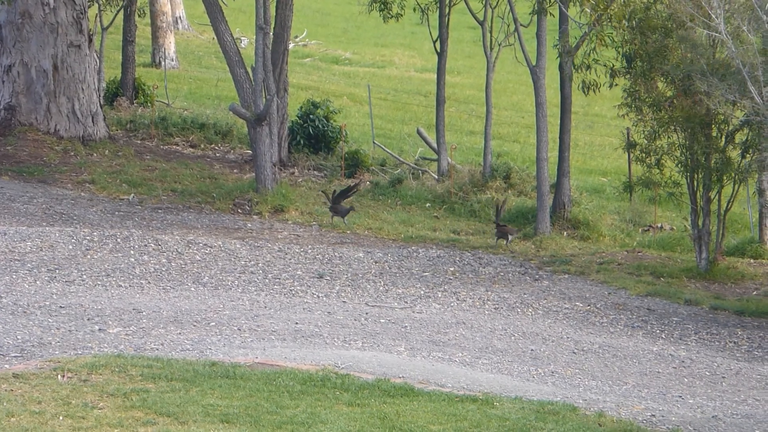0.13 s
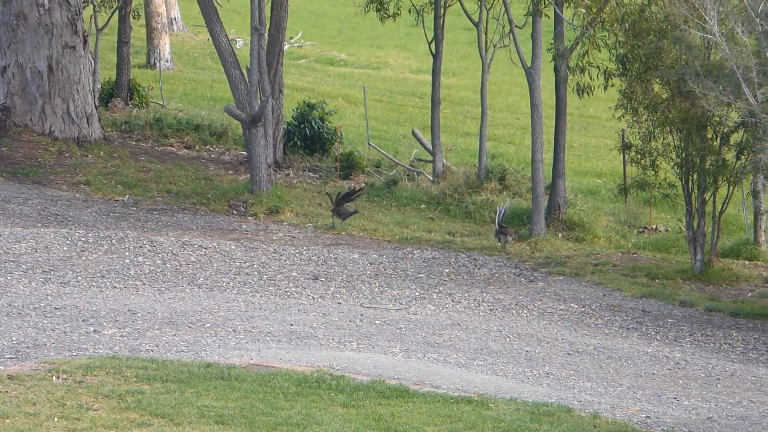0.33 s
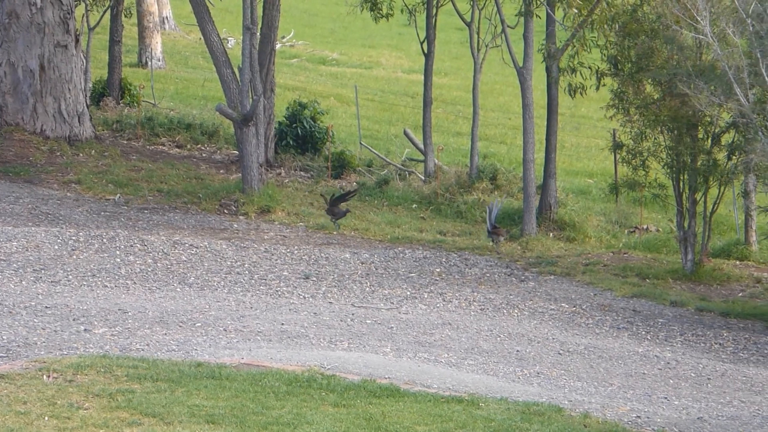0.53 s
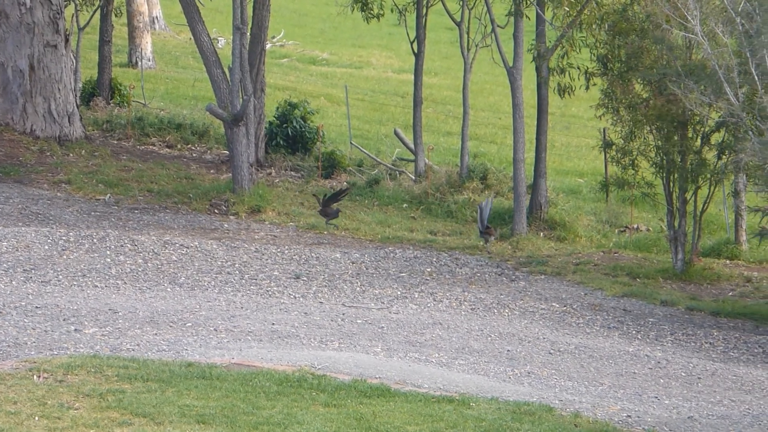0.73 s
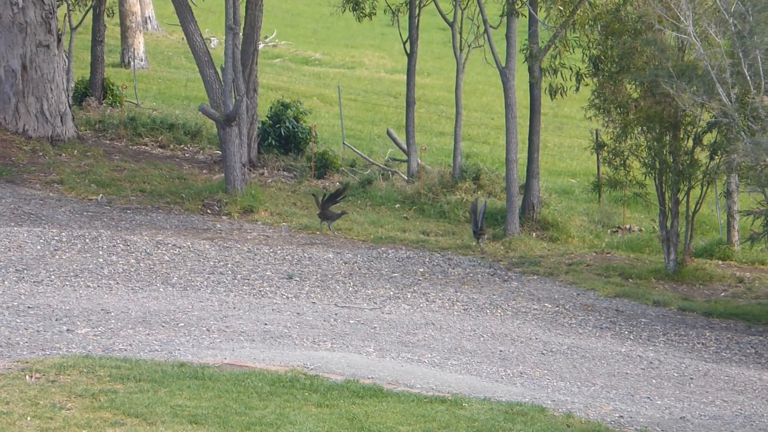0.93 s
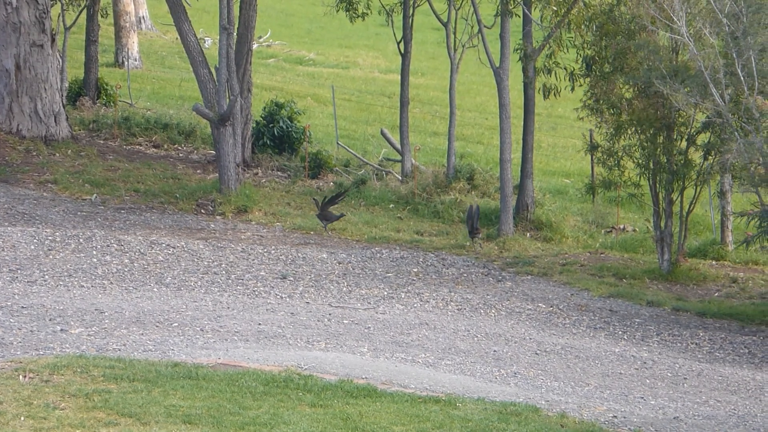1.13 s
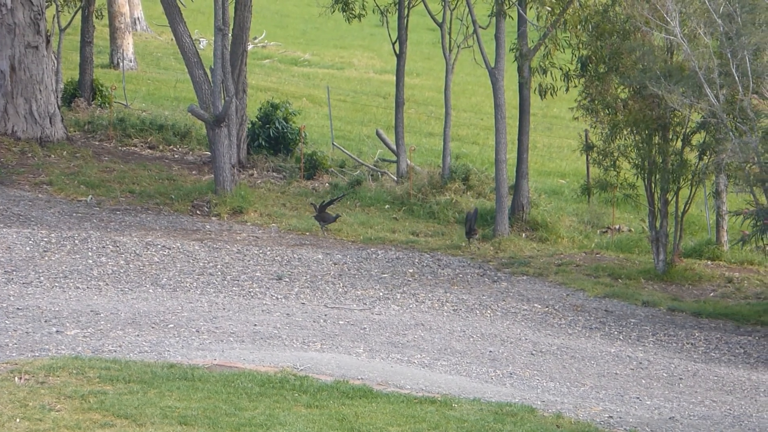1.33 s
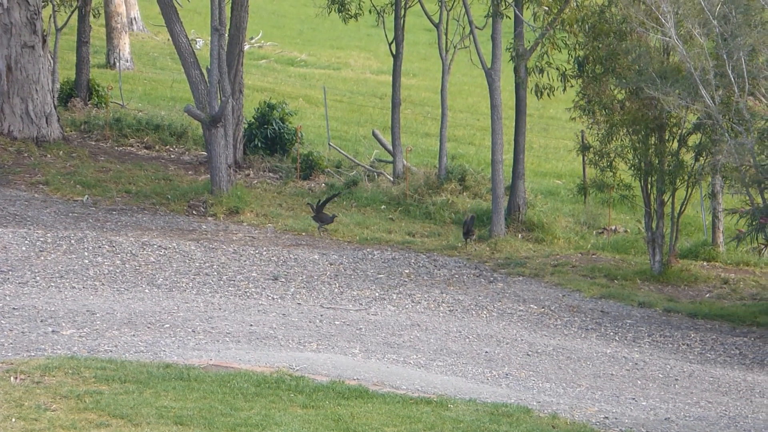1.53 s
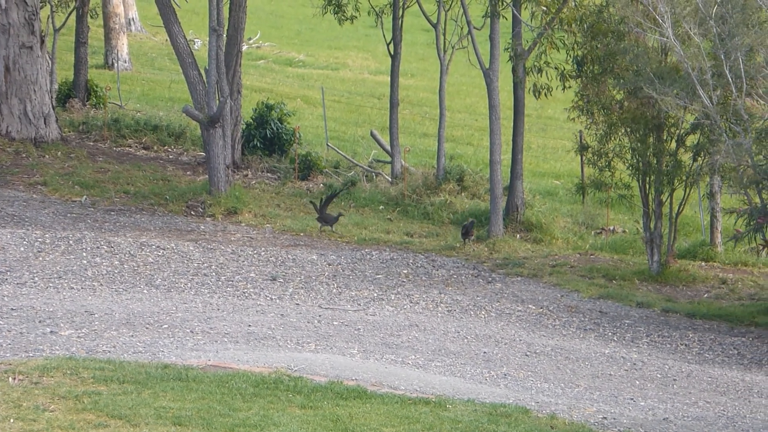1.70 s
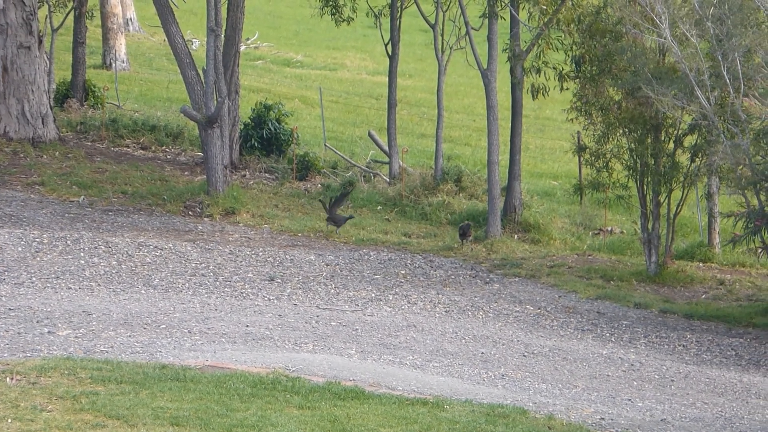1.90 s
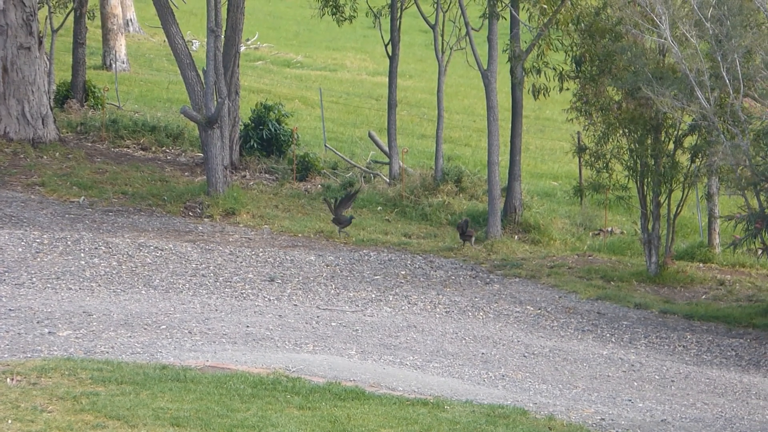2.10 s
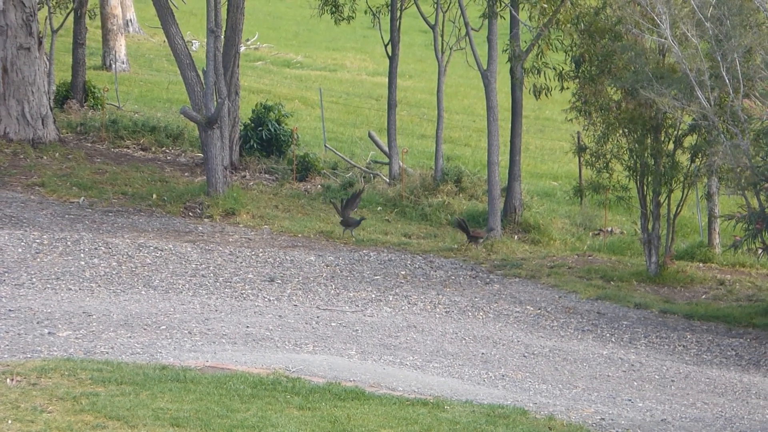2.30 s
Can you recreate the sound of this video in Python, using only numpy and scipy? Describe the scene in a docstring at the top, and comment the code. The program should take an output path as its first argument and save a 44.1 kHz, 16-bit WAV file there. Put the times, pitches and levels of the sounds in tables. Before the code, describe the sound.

A bird some way off whistles three quick calls, each a soft slur flicking into a sharp rising chirp, echoing among trees; then only low steady outdoor noise until a faint fourth call begins at the end.

```python
"""A bird some way off among trees gives three whistled calls and begins a fourth: a soft slur, then a sharp upward sweep.
Each note is a gliding near-pure tone with a fast warble in pitch and loudness, a weak octave and a trace of rasp.
Trunks, foliage and far trees scatter it into a dying tail of random echoes.
Behind it lie steady shaped noise, a low wavering hum with one soft thud, and a faint high hiss."""
import sys
import numpy as np
from scipy import signal
from scipy.fft import rfft, irfft
from scipy.io import wavfile
from scipy.ndimage import uniform_filter1d, map_coordinates

SR = 44100
rng = np.random.default_rng(int(sys.argv[2]) if len(sys.argv) > 2 else 0)


def store_wav(level_fs):
    """Save 16-bit WAV to argv[1]."""
    pcm = np.round(np.clip(np.atleast_2d(level_fs), -1, 1) * 32767)
    wavfile.write(sys.argv[1], SR, pcm.T.astype(np.int16))


N = 103635


def undb(db):
    """Decibels to amplitude gain."""
    return 10 ** (np.asarray(db) / 20)


def unit(x):
    """Scale to rms 1."""
    return x / np.sqrt(np.mean(x ** 2))


def walk(rate_hz):
    """Smooth random curve of rms 1: random steps at rate_hz, averaged twice over one step."""
    step = int(SR / rate_hz)
    steps = np.repeat(rng.standard_normal(N // step + 1), step)
    smooth = uniform_filter1d(uniform_filter1d(steps, step), step)
    return unit(smooth[:N])


def bin_gains(points):
    """Gain of each FFT bin from (hz, db) points, interpolated over log frequency."""
    hz, db = np.array(points, float).T
    bin_hz = np.arange(N // 2 + 1) * SR / N
    return undb(np.interp(np.log(bin_hz + 1), np.log(hz), db))


def shaped_noise(gain):
    """White noise filtered by a gain per FFT bin."""
    return irfft(rfft(rng.standard_normal(N)) * gain, N)


def overtone_gain(pitch_hz):
    """Octave gain: the throat damps the octave above a knee, down to a weak floor."""
    low_db, floor_db, knee_hz = -21, -42, 3200
    return undb(low_db) / np.sqrt(1 + (2 * pitch_hz / knee_hz) ** 20) + undb(floor_db)


def note(t, curve, warble):
    """Gliding whistle whose warble deepens with loudness; a pitch lead makes a sweep climb in steps."""
    # hiss that goes with the tone: hz, level_db (per Hz, relative)
    rasp_band = [(3000, -21), (6000, -7), (8000, -8), (11000, -3.5), (13000, -34)]
    rasp_db, fade_s = -45, 0.0021
    jitter = 0.0026  # rms fraction of pitch
    softening = .45  # dB of warble depth lost per dB below the loudest point

    time_s, pitch_hz, level_db = np.array(curve, float).T
    rate_hz, crest_s, swing_hz, dip_db, lead_rad = warble
    loudness_db = np.interp(t, time_s, level_db)
    depth = undb(softening * (loudness_db - level_db.max()))
    beat = 2 * np.pi * rate_hz * (t - crest_s)

    swing = depth * swing_hz * np.cos(beat + lead_rad)
    pitch = (np.interp(t, time_s, pitch_hz) + swing) * (1 + jitter * walk(600))
    phase = 2 * np.pi * np.cumsum(pitch) / SR
    tone = np.sin(phase) + overtone_gain(pitch) * np.sin(2 * phase)
    rasp = undb(rasp_db) * unit(shaped_noise(bin_gains(rasp_band)))

    fade_in = np.clip((t - time_s[0]) / fade_s + 1, 0, 1)
    fade_out = np.clip((time_s[-1] - t) / fade_s + 1, 0, 1)
    trough = ((1 - np.cos(beat)) / 2) ** 2
    level = undb(loudness_db - dip_db * np.sqrt(depth) * trough)
    return (np.sqrt(2) * tone + rasp) * fade_in * fade_out * level


def scatter(x, t60_s, level_db, likeness):
    """Sparse random echoes from the trees, dying exponentially, partly shared by the two ears."""
    first_echo_s, echoes_per_s = .009, 4000
    t = np.arange(N) / SR
    hits = rng.random((3, N)) < echoes_per_s / SR
    echoes = rng.standard_normal((3, N)) * hits
    echoes = echoes * (t > first_echo_s) * np.exp(-np.log(1000) * t / t60_s)
    echoes = echoes / np.sqrt(np.sum(echoes ** 2, axis=1, keepdims=True) + 1e-18)
    share = np.clip(likeness, 0, 1)
    response = np.sqrt(share) * echoes[0] + np.sqrt(1 - share) * echoes[1:]
    return undb(level_db) * signal.fftconvolve(x[None], response, axes=1)[:, :N]


def bird(t):
    """Notes slightly left by level and arrival time, plus echoes from trunks, foliage and far trees."""
    # note curves: time_s, pitch_hz, level_db
    slur_1 = [(0.087, 2096, -45), (0.109, 2200, -32), (0.136, 2300, -24.5), (0.164, 2317, -20),
              (.18, 2097, -21), (0.199, 1557, -30.5), (0.217, 1234, -36.5), (0.238, 1284, -40)]
    sweep_1 = [(0.235, 1350, -33), (.252, 1856, -32.5), (.263, 2184, -19.5), (0.275, 2530, -16),
               (.289, 3002, -12), (0.3, 3445, -16.5), (.313, 3830, -24.5), (.326, 4140, -33)]
    slur_2 = [(.505, 1705, -49), (0.512, 1562, -39), (0.527, 1404, -46.5), (0.532, 1177, -34.5),
              (0.546, 1085, -46), (.565, 796, -54.5), (0.582, 777, -43)]
    sweep_2 = [(.58, 797, -52.5), (.593, 1460, -45.5), (.604, 2174, -29.5), (0.616, 2663, -18),
               (.629, 3070, -17), (.641, 3720, -26), (0.652, 4160, -38), (0.663, 4330, -41)]
    slur_3 = [(0.806, 1650, -53), (.82, 1493, -55), (.845, 1159, -51), (0.871, 839, -51.5), (.89, 733, -53)]
    sweep_3 = [(0.941, 878, -48), (.96, 1281, -41), (.976, 1571, -28), (.987, 1890, -33),
               (0.996, 2225, -21), (1.003, 2653, -13.5), (1.014, 3270, -26.5), (1.022, 3810, -39),
               (1.03, 3900, -36.5)]
    slur_4 = [(2.275, 2080, -58), (2.295, 2074, -41), (2.319, 2090, -44), (2.336, 2280, -36),
              (2.352, 2500, -31.5)]
    # warble per note at its loudest: rate_hz, crest_s, pitch_swing_hz, dip_db,
    # lead_rad (pitch ahead of loudness)
    warbles = [(75, .1372, 210, 12, 0), (78.5, .2756, 150, 9, .7), (60, .533, 30, 5, .7),
               (83, .6176, 150, 9, .8), (60, .82, 30, 5, .7), (97, 1.0028, 105, 5, 1.1),
               (75, 2.335, 25, 2, 0)]
    # echo tails: t60_s, level_db, likeness (left-right, 0-1)
    trunks = (.13, -12.5, .9)
    foliage = (0.49, -12, 0.84)
    far_trees = (1.07, -20, 0.62)
    right_lag_s, pan_db = 2.4e-5, 1.5

    curves = [slur_1, sweep_1, slur_2, sweep_2, slur_3, sweep_3, slur_4]
    song = sum(note(t, curve, warble) for curve, warble in zip(curves, warbles))
    late = map_coordinates(song, [(t - right_lag_s) * SR], mode="nearest")
    direct = np.array([song * undb(pan_db / 2), late * undb(-pan_db / 2)])
    return direct + scatter(song, *trunks) + scatter(song, *foliage) + scatter(song, *far_trees)


def air():
    """Steady outdoor noise with a slight flicker; independent side noise sets its width by frequency."""
    # spectrum: hz, level_db (relative)
    air_band = [(25, -32), (45, -20), (70, -12.5), (120, -7.5), (180, -3.5), (300, -3.5), (500, -5),
                (700, -6), (1100, -10.5), (2100, -14.5), (3300, -11.5), (4200, -16.5), (5000, -22),
                (6500, -29.5), (8000, -39), (10500, -34), (12500, -55.5), (15000, -67)]
    # stereo width: hz, side_minus_mid_db
    side_band = [(30, -8), (70, -12), (200, -19.5), (400, -14.5), (800, -9.5), (1500, -2.5), (3000, -10),
                 (6000, -6), (12000, -2)]
    mid_db, flicker_db = -45, -0.26
    mid = shaped_noise(bin_gains(air_band))
    side = shaped_noise(bin_gains(air_band) * bin_gains(side_band))
    level = undb(mid_db + flicker_db * walk(8.2))
    return np.array([mid + side, mid - side]) / np.std(mid) * level


def hum(t):
    """Low sine whose level wavers at random."""
    pitch_hz, level_db, waver_db = 99.8, -59, -1.2
    level = undb(level_db + waver_db * walk(6))
    return np.sqrt(2) * np.sin(2 * np.pi * pitch_hz * t) * level


def thud(t):
    """One soft low sine burst in a bell-shaped envelope."""
    centre_s, length_s, pitch_hz, level_db = .925, .018, 112, -50
    since_s = t - centre_s
    envelope = np.exp(-(since_s / length_s) ** 2)
    return np.sqrt(2) * np.sin(2 * np.pi * pitch_hz * since_s) * envelope * undb(level_db)


def hiss(t):
    """Faint high band noise, mid and side independent, that swells for about a second, then eases."""
    # level curve: time_s, level_db
    hiss_curve = [(0, -90), (.9, -88), (1.05, -68), (2.0, -66), (2.12, -75), (2.35, -71)]
    # spectrum: hz, level_db (per Hz, relative)
    hiss_band = [(6000, -10), (8500, -7.5), (10300, -0.5), (12000, -11.5), (15000, -17.5)]
    side_db = -3
    gain = bin_gains(hiss_band)
    mid = unit(shaped_noise(gain))
    side = undb(side_db) * unit(shaped_noise(gain))
    time_s, level_db = np.array(hiss_curve).T
    return np.array([mid + side, mid - side]) * undb(np.interp(t, time_s, level_db))


def scene():
    """The bird over its background."""
    t = np.arange(N) / SR
    return bird(t) + air() + hum(t) + thud(t) + hiss(t)


def record(dry):
    """Notch out one narrow treble band, then cut the top steeply."""
    notch_hz, half_width_hz, top_hz = 9000, 340, 15100
    edges_hz = [notch_hz - half_width_hz, notch_hz + half_width_hz]
    notch = signal.butter(4, edges_hz, "bandstop", fs=SR, output="sos")
    top = signal.ellip(10, .2, 80, top_hz, fs=SR, output="sos")
    return signal.sosfilt(top, signal.sosfilt(notch, dry))


dry = scene()
out = record(dry)
store_wav(out)
```